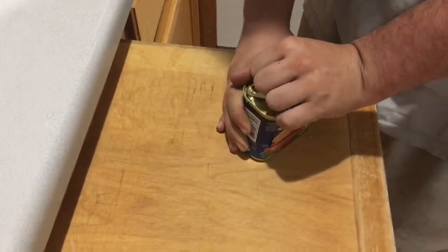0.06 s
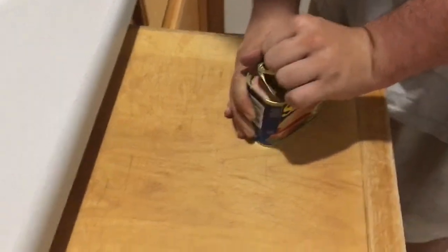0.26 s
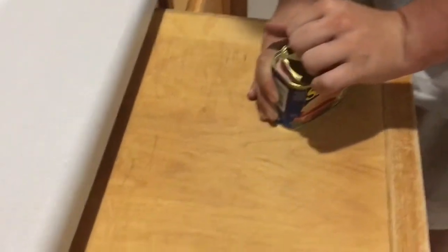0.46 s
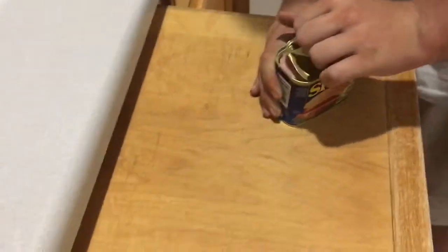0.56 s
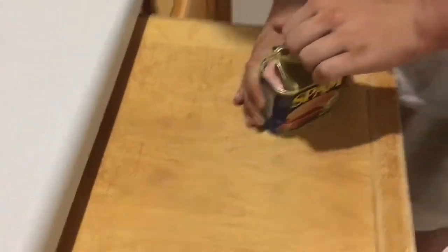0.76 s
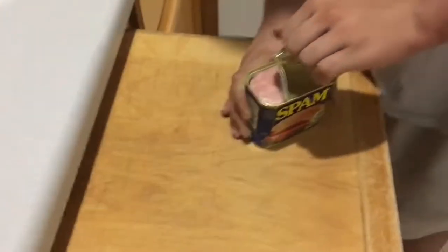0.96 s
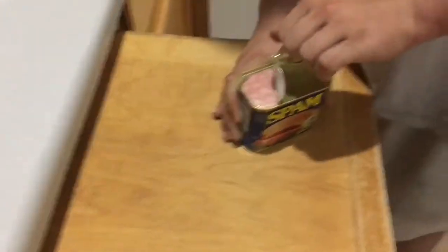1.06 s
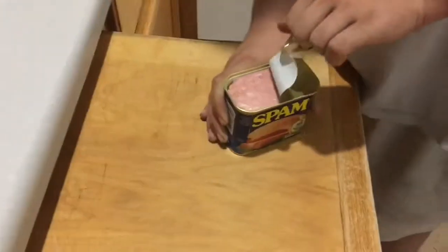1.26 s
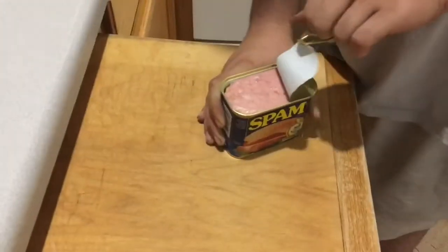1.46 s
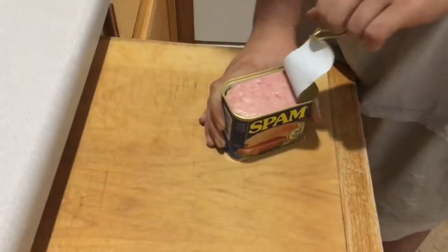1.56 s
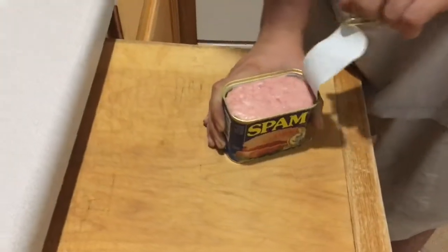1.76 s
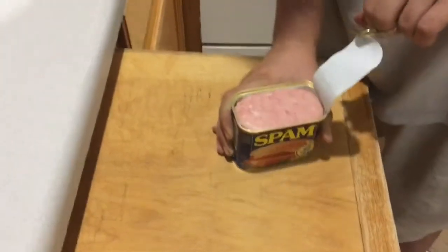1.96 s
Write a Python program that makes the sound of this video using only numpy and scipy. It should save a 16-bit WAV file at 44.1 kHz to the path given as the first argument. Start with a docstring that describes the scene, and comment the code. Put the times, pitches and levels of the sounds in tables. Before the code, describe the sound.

A metal lid is peeled off a tin with jerky rasps and sharp clicks.

```python
"""A quiet kitchen: a ring-pull lid is peeled off a full tin on a wooden counter.
The scored metal tears in stick-slip jerks. Each slip is a crack and a burst of a few milliseconds
that ring the thin lid, whose resonances change as the free flap grows. The tin bumps the counter once,
the flap snaps free midway, a dry pop sounds close by at the end. The room rumbles and echoes."""
import sys
import numpy as np
from scipy import signal
from scipy.fft import rfft, irfft, next_fast_len
from scipy.io import wavfile

SR = 44100
rng = np.random.default_rng(int(sys.argv[2]) if len(sys.argv) > 2 else 0)


def store_wav(level_fs):
    """Save 16-bit WAV to argv[1]."""
    pcm = np.round(np.clip(np.atleast_2d(level_fs), -1, 1) * 32767)
    wavfile.write(sys.argv[1], SR, pcm.T.astype(np.int16))


N = 88200
SLIP_RISE_S = 0.0002
# distinct slips of the score line: (time [s], level [dB], treble offset [dB], t60 [s])
SLIPS = [(0.0445, -42, -3, 0.01), (0.0689, -39.5, -3.5, 0.011), (0.0972, -38, -1, 0.012),
         (0.1033, -45, 6, 0.011), (0.1085, -49, -1, 0.0092), (0.1585, -41.5, -10, 0.012),
         (0.166, -33.5, -1, 0.0099), (0.1763, -31, 9.5, 0.012), (0.197, -34, -8, 0.0077),
         (0.2128, -44, -13, 0.017), (0.2162, -37, 1, 0.0068), (0.224, -34.5, 4, 0.017),
         (0.2347, -30, 4, 0.008), (0.2593, -33.5, 4, 0.013), (0.265, -31, -5, 0.011),
         (0.272, -26, 3, 0.017), (0.29, -24.5, -4, 0.019), (0.296, -26.5, 6, 0.015),
         (0.321, -33, -1, 0.0091), (0.5916, -64, 13, 0.026), (0.6012, -52, -3, 0.0092),
         (0.6092, -52, 17.5, 0.0039), (0.8161, -28.5, 0, 0.0062), (0.83, -45, -15, 0.0084),
         (0.8367, -43, -20, 0.0076), (0.841, -39, -14, 0.013), (0.847, -42, -13, 0.012),
         (0.856, -38.5, -13.5, 0.016), (0.868, -38, -7, 0.0094), (0.8794, -51, -15, 0.0077),
         (0.892, -24.5, 4, 0.012), (0.9035, -32.5, 3, 0.01), (0.9145, -43, 1, 0.011),
         (0.9223, -32, -4, 0.0091), (0.9292, -41, 2, 0.014), (0.945, -35, -6, 0.013),
         (0.9697, -45, -5, 0.0079), (1.0734, -48, -10, 0.011), (1.1, -46.5, -8, 0.018),
         (1.1173, -41, -6, 0.0086), (1.133, -43.5, -8, 0.017), (1.1376, -48, -15, 0.0094),
         (1.1588, -42, -5, 0.014), (1.165, -48.5, -6, 0.042), (1.178, -41, 7.5, 0.006),
         (1.186, -44, 7, 0.009), (1.1913, -39, 2.5, 0.0087), (1.1994, -31, 5.5, 0.012),
         (1.2044, -42.5, 5, 0.01), (1.211, -42, 0, 0.0071), (1.2223, -46, 5, 0.0089),
         (1.242, -41.5, 20, 0.0034), (1.2467, -38, 5, 0.01), (1.2592, -42, 8, 0.0082),
         (1.2709, -53, -5, 0.0092), (1.2764, -43, -16, 0.0087), (1.2953, -35, -11, 0.0053),
         (1.32, -42, -3, 0.0051), (1.329, -56, 0, 0.0095), (1.369, -48, 10, 0.0048),
         (1.375, -40, -11, 0.0052), (1.397, -45, 2, 0.0088), (1.406, -58.5, 17, 0.01),
         (1.426, -52, 19.5, 0.0061), (1.4558, -47, 4, 0.019), (1.47, -42, -3, 0.0098),
         (1.477, -51, 6.5, 0.0083), (1.5075, -38, -2, 0.0073), (1.516, -34, -2, 0.0072),
         (1.5224, -35, 6.5, 0.012), (1.535, -43, -3, 0.0075), (1.542, -53, 7, 0.0093),
         (1.5592, -41.5, 13, 0.013), (1.6287, -36, 8, 0.018), (1.637, -23.5, -5.5, 0.015),
         (1.6443, -22, 0, 0.014), (1.651, -29, 3, 0.017), (1.661, -32, 7, 0.011), (1.6647, -47, -7, 0.011),
         (1.693, -31, -6, 0.0092), (1.7088, -34.5, -1, 0.012), (1.732, -52, -3, 0.022),
         (1.752, -47.5, -2, 0.011), (1.7632, -34.5, -9, 0.013), (1.8246, -34, 4, 0.016)]


def amp(db):
    """Decibels to gain."""
    return 10 ** (np.asarray(db) / 20)


def rms_one(x):
    """Scale to unit rms."""
    return x / np.sqrt(np.mean(x ** 2) + 1e-20)


def butter(x, order, hz, kind):
    """Butterworth filter."""
    return signal.sosfilt(signal.butter(order, hz, kind, fs=SR, output="sos"), x)


def coloured(x, spectrum):
    """Shape by a (Hz, dB) spectrum; white input keeps its rms."""
    hz, db = np.transpose(spectrum)
    size = next_fast_len(len(x) + 4096)
    bins_hz = np.arange(size // 2 + 1) * SR / size
    gain = amp(np.interp(np.log(bins_hz + 1), np.log(hz), db))
    return irfft(rfft(x, size) * rms_one(gain), size)[:len(x)]


def drift(size, rate_hz=45):
    """Smooth random wander, spread about 1."""
    step = SR / rate_hz
    knots = np.arange(0, size + SR, step)
    return np.interp(np.arange(size) + rng.uniform(0, step), knots, rng.standard_normal(len(knots)))


def struck(start_s, modes, rise_s):
    """Impact: decaying sines with a soft onset."""
    t = np.maximum(np.arange(N) / SR - start_s, 0)
    ring = sum(amp(db - 60 * t / t60_s) * np.sin(2 * np.pi * hz * t) for hz, db, t60_s in modes)
    return ring * (1 - np.exp(-t / rise_s))


def room_rumble(level_db=-47.5):
    """Steady low room noise."""
    # noise spectrum: (frequency [Hz], relative density [dB])
    spectrum = [(12, -71), (20, -109), (43, -7), (101, -5), (150, -2.5), (255, -11), (399, -20),
                (446, -18.5), (485, -25), (607, -31), (718, -27), (873, -32.5), (2260, -34), (2750, -40),
                (16000, -46)]
    return amp(level_db) * rms_one(coloured(rng.standard_normal(N), spectrum))


def kitchen_echo(x, level_db=-18.5, t60_s=0.37, delay_s=0.006, wall_cut_hz=5300):
    """Wall reflections: a dull, decaying noise tail."""
    t = np.arange(SR // 2) / SR
    tail = rng.standard_normal(len(t)) * amp(-60 * t / t60_s) * (t > delay_s)
    tail = butter(tail, 1, wall_cut_hz, "low")
    return amp(level_db) * signal.fftconvolve(x, tail / np.sqrt(np.sum(tail ** 2)))[:N]


def close_pop():
    """A short, dry pop close by."""
    # pop modes: (frequency [Hz], level [dB], t60 [s])
    modes = [(685, -26.5, 0.019), (830, -27.5, 0.013), (2330, -17, 0.0043), (4080, -16, 0.0035),
             (7170, -4, 0.0014), (9260, -12.5, 0.0021), (12600, -12, 0.0016)]
    return struck(1.9055, modes, rise_s=0.00046)


def counter_bump():
    """The tin thuds on the wood."""
    # counter modes: (frequency [Hz], level [dB], t60 [s])
    modes = [(95, -29, 0.17), (59, -38, 0.31)]
    return struck(0.335, modes, rise_s=0.011)


def flap_snap():
    """The flap snaps free and rings briefly."""
    # flap modes: (frequency [Hz], level [dB], t60 [s])
    modes = [(683, -40, .07), (1263, -28, 0.023), (1707, -37.5, 0.092), (2570, -28.5, 0.065),
             (3270, -34.5, 0.056), (5640, -19.5, 0.01), (7550, -26, 0.0095), (8900, -23, 0.01),
             (11460, -21, 0.0074)]
    return struck(0.8931, modes, rise_s=0.00075)


def tin_body(drive):
    """Damped resonances of the full tin, alternating in sign, near unit power gain."""
    # body modes: (frequency [Hz], width [Hz], relative level [dB])
    modes = [(541, 115, -3.5), (722, 130, 0.5), (993, 363, -2.5), (1356, 134, 0.5)]
    out, power = 0, 0
    for k, (hz, width_hz, db) in enumerate(modes):
        r = np.exp(-np.pi * width_hz / SR)
        gain = amp(db) * (1 - r * r) / 2
        poles = [1, -2 * r * np.cos(2 * np.pi * hz / SR), r * r]
        out += (-1) ** k * signal.lfilter([gain, 0, -gain], poles, drive + 1e-18)
        power += amp(db) * gain
    return out / np.sqrt(power)


def rasp(drive):
    """The non-ringing part of the tearing."""
    # rasp spectrum: (frequency [Hz], relative density [dB])
    spectrum = [(1300, -46), (2200, -1.5), (3700, 0.5), (5000, -1.5), (9300, -1.5), (15000, -2), (16500, 2)]
    return butter(coloured(drive, spectrum), 4, 1500, "high")


def bending(drive, widths_hz=(320, 250)):
    """Two resonances glide as the flap bends back."""
    # one curve per resonance: (time [s], frequency [Hz], level [dB])
    glides = [
        [(1.15, 1710, -15), (1.17, 1770, -1), (1.23, 1840, 0), (1.26, 2140, 1), (1.3, 2180, 6.5),
         (1.36, 2290, 0), (1.5, 2380, 1)],
        [(1.38, 10700, -16), (1.398, 9900, -3), (1.43, 9900, -1), (1.46, 9400, 2), (1.48, 9200, 11),
         (1.51, 9320, -1), (1.55, 9000, -20)],
    ]
    t, out = np.arange(N) / SR, 0
    for curve, width_hz in zip(glides, widths_hz):
        s, hz, db = np.transpose(curve)
        carrier = np.exp(2j * np.pi * np.cumsum(np.interp(t, s, hz)) / SR)
        r = np.exp(-np.pi * width_hz / SR)
        # shift to 0 Hz, low-pass, shift back
        band = signal.lfilter([np.sqrt(1 - r * r)], [1, -r], drive / carrier) * carrier
        out += band.real * amp(np.interp(t, s, db, left=-120, right=-120))
    return out


def flap(drive, modes, widen_hz=88, detune=0.01, flicker_db=2):
    """The bending flap detunes each resonance at random and lets it come and go."""
    out, power = 0, 0
    for k, (hz, width_hz, db) in enumerate(modes):
        r = np.exp(-np.pi * (width_hz + widen_hz) / SR)
        pitch_hz = hz * (1 + detune * drift(len(drive)))
        carrier = np.exp(2j * np.pi * np.cumsum(pitch_hz) / SR)
        flickering = drive * amp(db + flicker_db * drift(len(drive)))
        band = signal.lfilter([2 * (1 - r)], [1, -r], flickering / carrier + 1e-18) * carrier
        out += (-1) ** k * band.real
        power += amp(2 * db) * (1 - r)
    return out / np.sqrt(power)


def lid_ring(drive, gain_db=2):
    """The thin lid rings with new modes for each stretch peeled."""
    # stretches: (start [s], modes (frequency [Hz], base width [Hz], relative level [dB]))
    stretches = [ (0, [(1894, 83, 3.5), (3260, 74, 5.5), (5300, 53, -13), (6500, 230, -1),
                 (7500, 210, -15.5), (8800, 430, -4.5), (10540, 140, -5), (11460, 840, -5.5)]),
                 (0.258, [(1140, 210, -6), (1520, 220, -3.5), (1850, 240, 1.5), (2540, 200, 4),
                 (3130, 380, -7), (4040, 350, -3.5), (5190, 480, -11), (5860, 620, -3.5),
                 (12200, 270, -10.5)]), (.5, [(2160, 360, 2.5), (4100, 130, -0.5), (5680, 350, -8),
                 (7660, 220, -3.5)]), (0.889, [(1420, 58, -11.5), (1700, 86, -4.5), (2440, 250, -1.5),
                 (3360, 85, 1), (4840, 230, -18), (5500, 120, -5.5), (7650, 110, -9), (8600, 140, -17),
                 (11490, 150, -5), (13000, 260, -5.5), (14300, 88, -13)]), (1.05, [(2470, 450, -2.5),
                 (3330, 130, -1), (4500, 120, -7), (5570, 99, 0.5), (6670, 73, -8), (8800, 60, -4),
                 (11400, 300, -5.5)]), (1.196, [(3000, 100, -3), (4660, 150, 3.5), (6100, 290, -9),
                 (8800, 100, 0), (9570, 150, -1), (11040, 180, 1), (12900, 47, -13), (13800, 51, -10),
                 (14900, 120, -4)]), (1.237, [(3090, 83, 5), (5800, 92, 3), (8500, 250, -32),
                 (6650, 99, 0.5), (9400, 82, 0.5), (12800, 400, -1)]), (1.294, [(3230, 230, -4),
                 (5750, 350, 2.5), (8730, 260, -0.5), (9300, 80, -7), (11850, 420, 1.5), (13200, 370, -5)]),
                 (1.386, [(3010, 110, 1.5), (3800, 35, 3.5), (4240, 150, 4.5), (7100, 34, -1.5),
                 (8600, 59, -12)]), (1.51, [(2240, 70, 7.5), (3090, 69, 4), (6500, 39, -10)]),
                 (1.633, [(2100, 100, 6.5), (2950, 150, 3), (3700, 53, 9.5), (4410, 270, 6), (6240, 130, 4),
                 (7020, 39, 9.5), (9330, 240, 6), (11680, 58, 6), (12900, 59, 0), (13700, 70, -18)]),
                 (1.696, [(2830, 160, 2), (4500, 65, 4.5), (6010, 120, -2), (7470, 220, 1.5),
                 (9550, 340, -2), (11300, 38, 0.5), (15000, 54, -5)]), (1.761, [(2450, 700, -0.5),
                 (4540, 410, -0.5), (5800, 680, -6), (9100, 1200, -4)]), ]
    ends_s = [s for s, _ in stretches[1:]] + [N / SR]
    ring = bending(drive)
    for (start_s, modes), end_s in zip(stretches, ends_s):
        i, j = int(start_s * SR), int(end_s * SR)
        rung = flap(np.append(drive[i:j], np.zeros(2000)), modes)[:N - i]
        ring[i:i + len(rung)] += rung
    return amp(gain_db) * butter(ring, 4, 1100, "high")


def tear(gain_db=-3, jerks_per_s=190, spread_db=1.8, t60_s=0.031, steady=0.86):
    """Running tear in uneven jerks: main, treble and body envelopes."""
    # one curve per pull: (time [s], level [dB], treble offset [dB], body offset [dB])
    pulls = [
        [(0.15, -89, 0, -5), (0.21, -65, 1, -16), (0.22, -45.5, -25, -24), (0.245, -34.5, -6, -12),
         (0.262, -29.5, 1, -26), (0.27, -22.5, -5, -23), (0.285, -20.5, -0.5, -28), (0.3, -30.5, 3.5, -6),
         (0.308, -30.5, -4.5, -6), (0.318, -46, 3, 5), (0.33, -55, -5, 6), (0.37, -62, -21, -22),
         (0.45, -64, -15, -21)],
        [(0.5, -77, -10, 2), (0.54, -71.5, 11.5, 6), (0.58, -70.5, 14.5, -10), (0.6, -49.5, 1.5, 0.5),
         (0.62, -72.5, 13, -2), (0.68, -74.5, 13, -6)],
        [(0.8, -63, -16, 5), (0.825, -52.5, -15, -2), (0.86, -53.5, -27, -4), (0.885, -68, -11, 8),
         (0.9, -43, -27, -4), (0.94, -40, -9, -5.5), (0.96, -51, -7, -4), (1.0, -49.5, -15, -4.5),
         (1.06, -59.5, -16, 0)],
        [(1.06, -70, -16, 6), (1.1, -54.5, -13, -2.5), (1.15, -62, -3, 4), (1.19, -54, -14, 3),
         (1.21, -38.5, -1.5, -8), (1.27, -45, 6, -4.5), (1.33, -46.5, 0.5, -3.5), (1.38, -46, -2.5, -2),
         (1.39, -52, -5, -5), (1.44, -48, -1, 0), (1.48, -53.5, -10, 2.5), (1.5, -51, -3, -5)],
        [(1.5, -65, -17, 10.5), (1.535, -42.5, 8, -3), (1.58, -35, -2.5, -14.5), (1.62, -40.5, 3.5, -8),
         (1.65, -31.5, -2, -15.5), (1.67, -26, 3, -19), (1.69, -35, 4.5, -16), (1.72, -37, 5.5, -10),
         (1.75, -47, 6.5, 0.5), (1.78, -58.5, -14, -3), (1.87, -56.5, -3, 2.5)],
    ]
    onsets = np.cumsum(rng.uniform(0.44, 1.6, 2000)) / jerks_per_s * SR
    inside, kicks = onsets < N, np.zeros(N)
    kicks[onsets[inside].astype(int)] = amp(spread_db * rng.standard_normal(2000))[inside]
    fade, rise = amp(-60 / (t60_s * SR)), np.exp(-1 / (SLIP_RISE_S * SR))
    pulses = signal.lfilter([1], np.convolve([1, -fade], [1, -rise]), kicks)
    jerks = rms_one(steady + rms_one(pulses))
    t, envelopes = np.arange(N) / SR, np.zeros((3, N))
    for pull in pulls:
        s, db, treble_db, body_db = np.transpose(pull)
        main_db = np.interp(t, s, db, left=-120, right=-120)
        envelopes += amp([main_db, main_db + np.interp(t, s, treble_db),
                          main_db + np.interp(t, s, body_db)])
    return amp(gain_db) * envelopes * jerks


def slips(gain_db=1, size=4000):
    """The score line gives way in short bursts: main and treble envelopes."""
    t = np.arange(size) / SR
    main, treble = np.zeros((2, N + size))
    for s, db, treble_db, t60_s in SLIPS:
        i = int(s * SR)
        burst = amp(db + gain_db - 60 * t / t60_s) * (1 - np.exp(-t / SLIP_RISE_S))
        main[i:i + size] += burst
        treble[i:i + size] += burst * amp(treble_db)
    return main[:N], treble[:N]


def cracks(gain_db=5.5):
    """One sharp click opens each slip: main and treble impulses."""
    s, db, treble_db, _ = np.transpose(SLIPS)
    clicks = np.zeros((2, N))
    clicks[:, (s * SR).astype(int) + 8] = amp([db, db + treble_db])
    return amp(gain_db) * clicks


def peeling(treble_from_hz=5000, tear_to_body_db=1, slip_to_body_db=-38.5):
    """Tearing metal rasps, rings the lid and shakes the tin's body."""
    slip_main, slip_treble = slips()
    tear_main, tear_treble, tear_body = tear()
    crack_main, crack_treble = cracks()
    noise = rng.standard_normal((2, N))
    main = noise[0] * (slip_main + tear_main) + crack_main
    treble = noise[1] * (slip_treble + tear_treble) + crack_treble
    drive = butter(main, 2, treble_from_hz, "low") + butter(treble, 2, treble_from_hz, "high")
    body_drive = noise[0] * (amp(tear_to_body_db) * tear_body + amp(slip_to_body_db) * slip_main)
    return lid_ring(drive) + rasp(drive) + tin_body(body_drive)


def scene():
    """Mono mix: rumble, peeling with its echo, dry bump, snap and pop."""
    tin = peeling()
    impacts = counter_bump() + flap_snap() + close_pop()
    return (room_rumble() + tin + kitchen_echo(tin) + impacts)[None]


def record(dry, stop_hz=16250):
    """Steep low-pass."""
    return signal.sosfilt(signal.cheby2(16, 60, stop_hz, fs=SR, output="sos"), dry)


dry = scene()
out = record(dry)
store_wav(out)
```